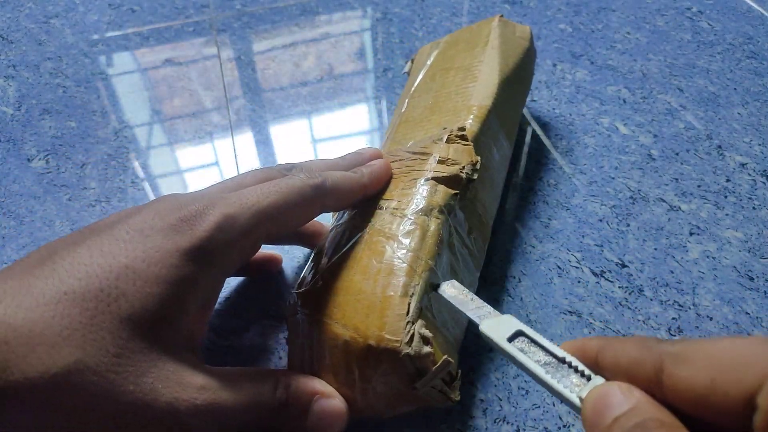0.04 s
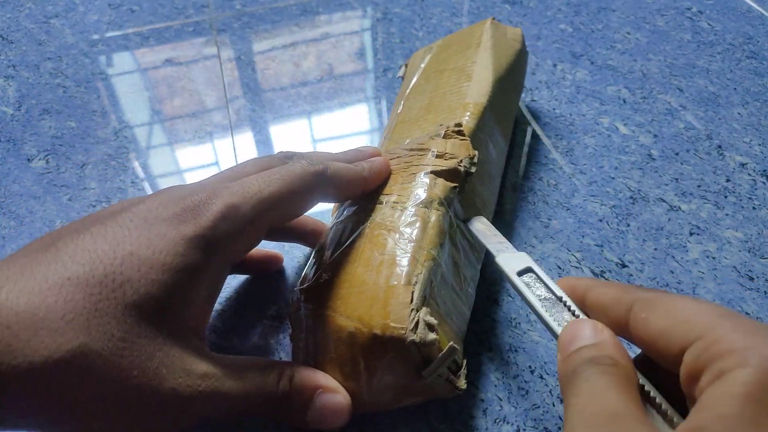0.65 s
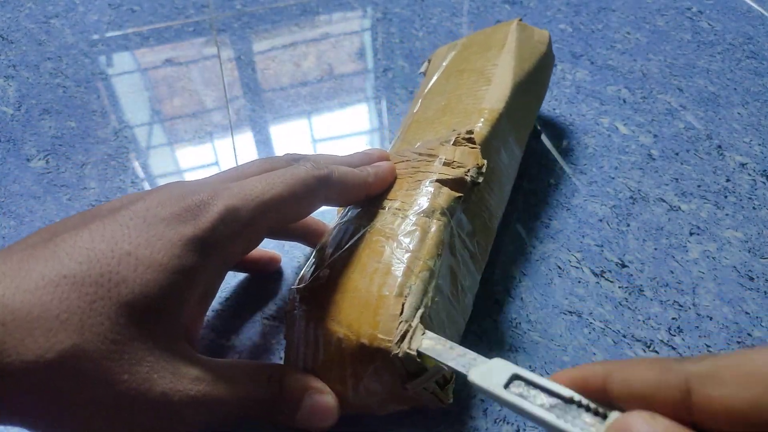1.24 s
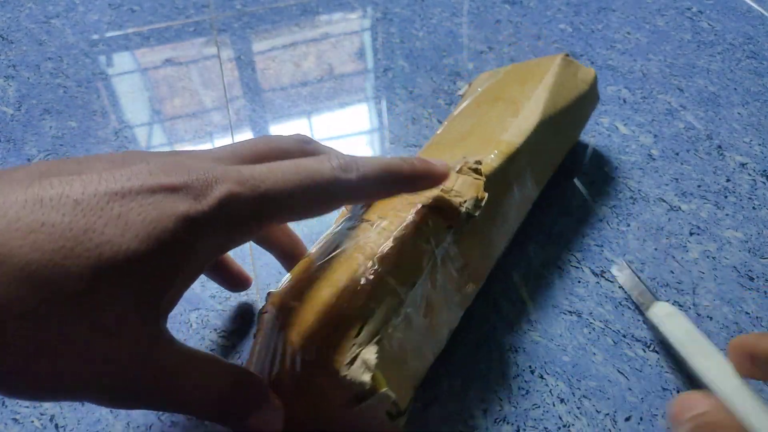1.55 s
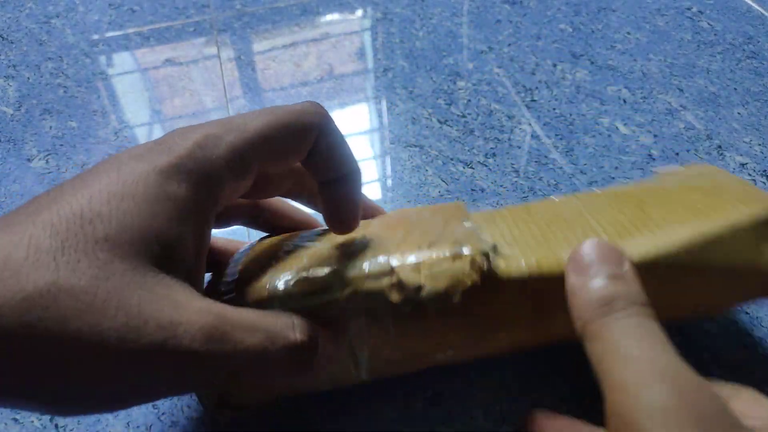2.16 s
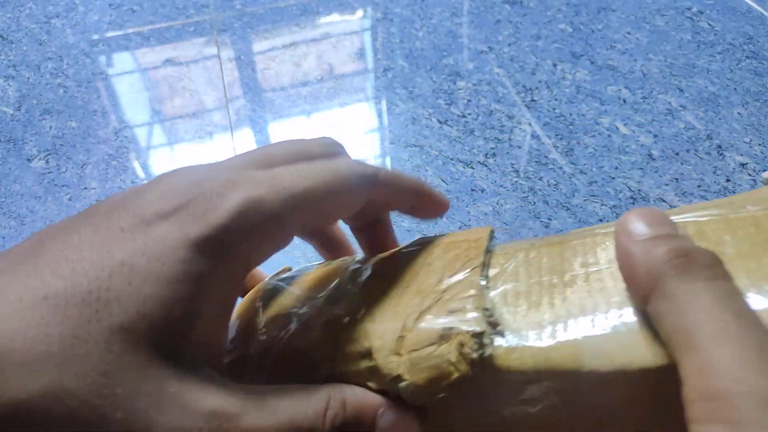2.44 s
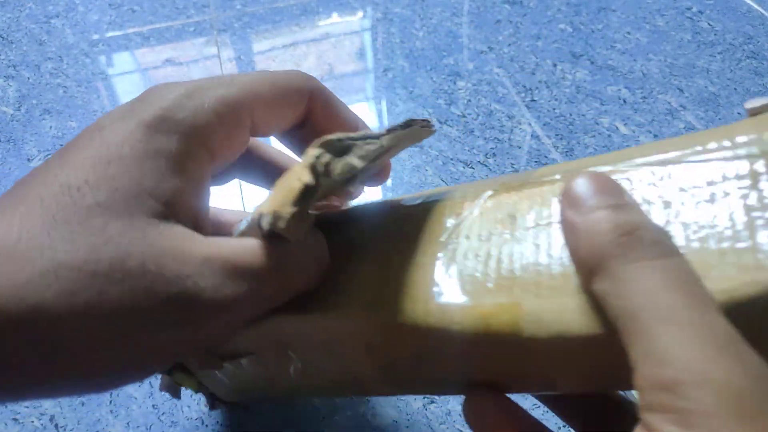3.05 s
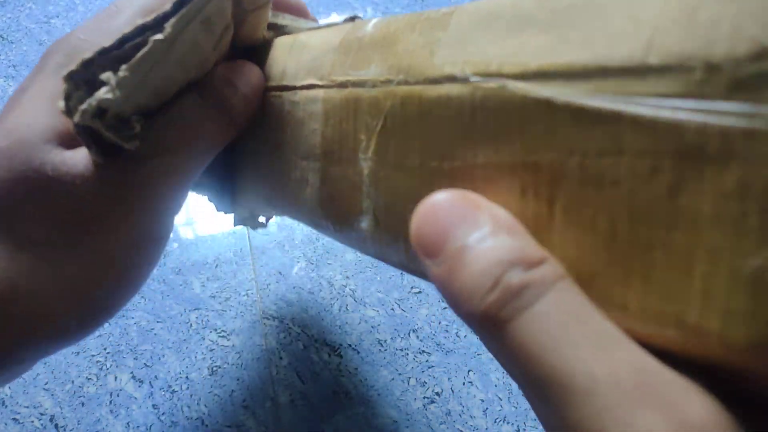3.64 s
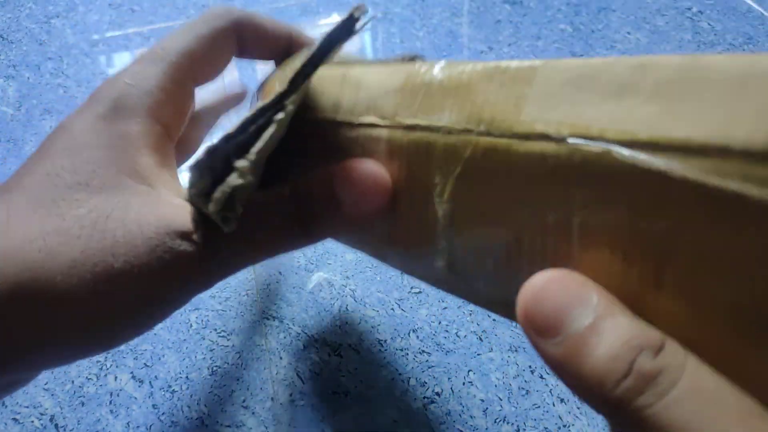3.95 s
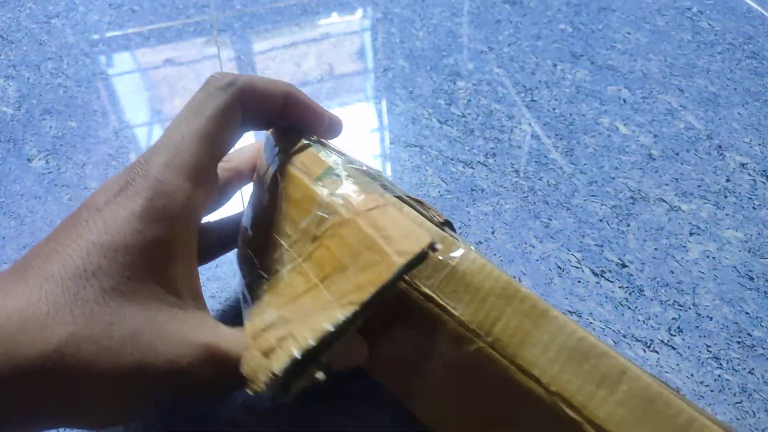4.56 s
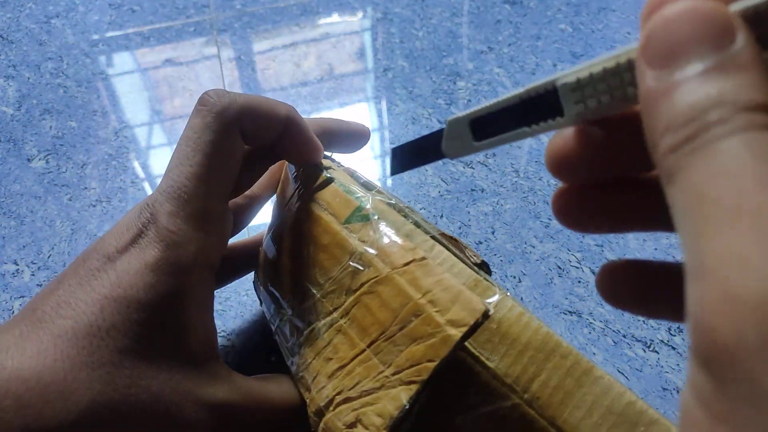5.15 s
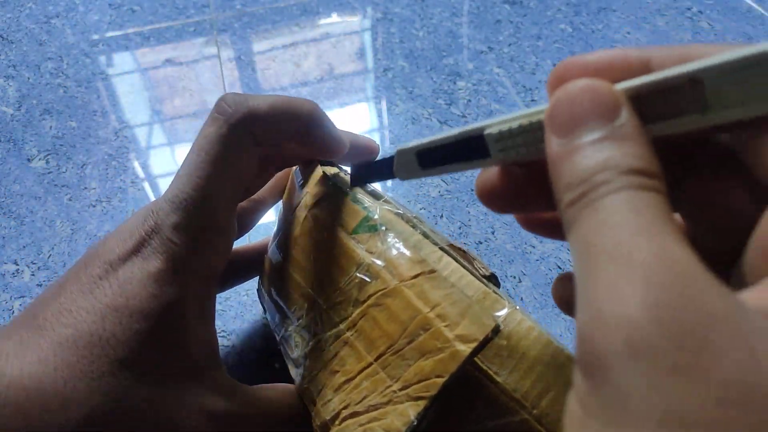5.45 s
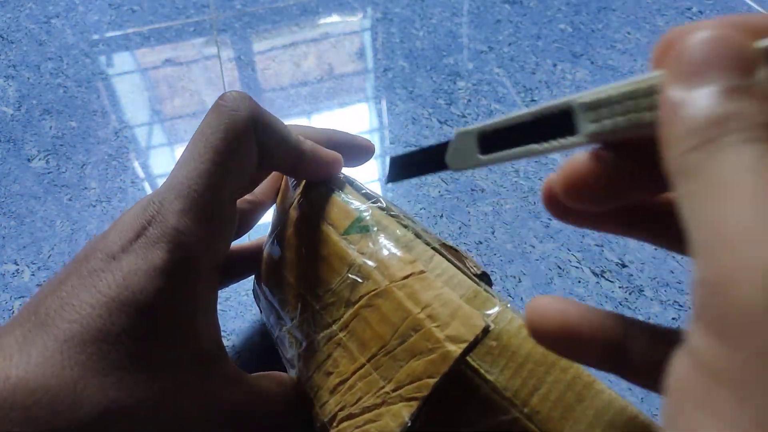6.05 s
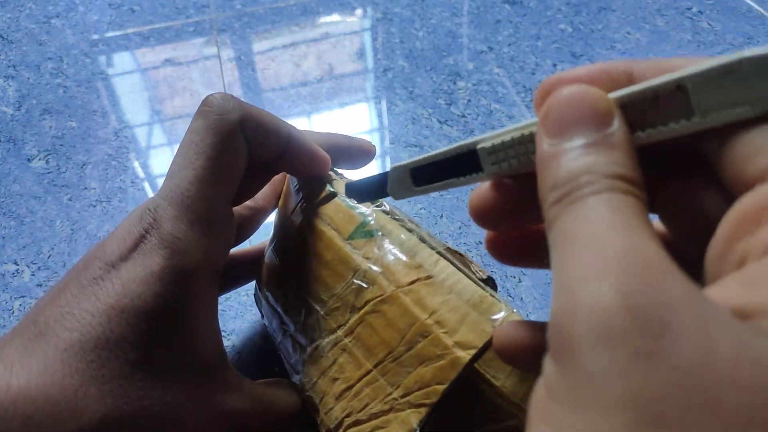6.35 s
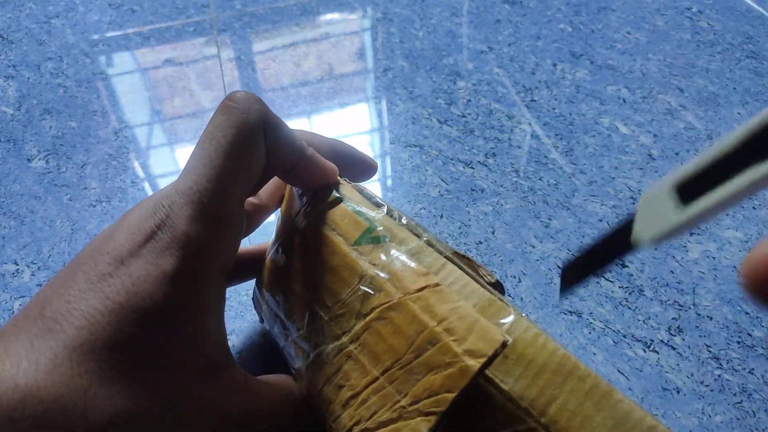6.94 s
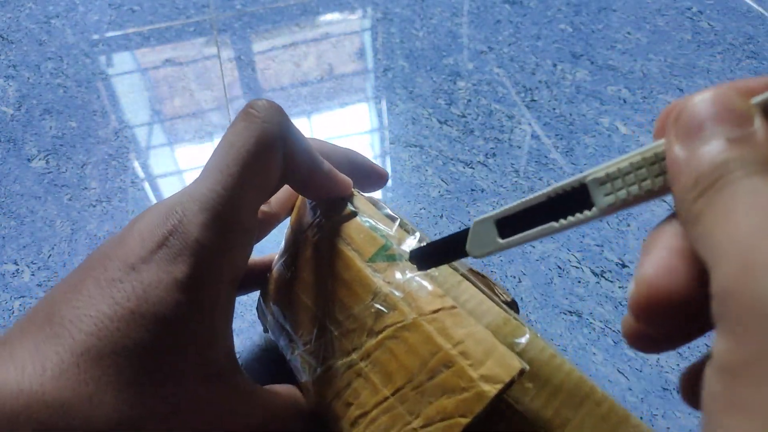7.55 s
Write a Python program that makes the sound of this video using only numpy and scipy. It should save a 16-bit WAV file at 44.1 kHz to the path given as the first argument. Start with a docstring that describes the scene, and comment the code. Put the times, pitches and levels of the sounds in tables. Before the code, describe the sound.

Small sharp cracks and faint rubbing as a knife cuts packing tape on a cardboard box in an echoing room.

```python
"""Short, sharp snaps and soft scraping: a snap-off knife picks at the tape on a cardboard parcel.
Each tear cracks the tight tape and shakes the card and the hollow box under it. The knife is laid
on the stone floor with a clatter, hands turn the parcel, and cutting resumes, ending in a squeak.
The hard-walled room echoes; behind it all are a soft room noise, a hum and a far engine's low drone."""
import sys
import numpy as np
from scipy import signal
from scipy.fft import rfft, irfft
from scipy.io import wavfile
from scipy.ndimage import uniform_filter1d

SR = 44100
rng = np.random.default_rng(int(sys.argv[2]) if len(sys.argv) > 2 else 0)


def master(y):
    """Save y as 16-bit WAV."""
    cut = np.clip(np.atleast_2d(y).T, -1, 1)
    pcm = np.round(cut * 32767)  # scale
    wavfile.write(sys.argv[1], SR, pcm.astype(np.int16))


N = 343980
TIME = np.arange(N) / SR   # clock for the whole scene [s]
HIT = np.arange(SR // 4) / SR   # clock for one short sound [s]
SMALL_SNAP_S = 0.0033   # length of one catch or crinkle


def from_db(db):
    """Turn decibels into a number to multiply by."""
    return 10 ** (np.asarray(db) / 20)


def rms_one(x):
    """Scale a sound to an average power of one."""
    return x / np.sqrt(np.mean(x ** 2) + 1e-20)


def peak_one(x):
    """Scale a sound so that its loudest two milliseconds have a power of one."""
    return x / np.sqrt(uniform_filter1d(x ** 2, size=88).max() + 1e-20)


def in_time(rows):
    """Join timed points with straight lines, giving one curve for each column after the time."""
    times, *columns = np.transpose(rows)
    return [np.interp(TIME, times, column) for column in columns]


def at_hz(points, hz):
    """Read a value between frequency points, with octaves evenly spaced."""
    frequencies, values = np.transpose(points)
    return np.interp(np.log(np.maximum(hz, 1)), np.log(frequencies), values)


def coloured(x, spectrum):
    """Shape a sound's bass and treble, then scale it to a power of one."""
    gains = from_db(at_hz(spectrum, np.fft.rfftfreq(N, 1 / SR)))
    return rms_one(irfft(rfft(x) * gains, N))


def drift(rate):
    """Wander around zero, gliding to a new random value `rate` times a second."""
    targets = rng.standard_normal(4000)
    return np.interp(TIME * rate, np.arange(len(targets)), targets)


def resonate(x, hz, width):
    """A resonance: keep the sound near one pitch. The narrower it is, the longer it rings."""
    r = np.exp(-np.pi * width / SR)
    feedback = [1, -2 * r * np.cos(2 * np.pi * hz / SR), r * r]
    return signal.lfilter(np.array([1, 0, -1]) * (1 - r * r) / 2, feedback, x + 1e-18)


def ring(hz, ring_s):
    """A struck tone that fades by 60 dB in its ring time."""
    return np.sin(2 * np.pi * hz * HIT) * from_db(-60 * HIT / ring_s)


def add(track, s, sound):
    """Mix a sound into a track, starting at second `s`."""
    i = max(round(s * SR), 0)
    track[i:i + len(sound)] += sound[:N - i]


def burst(length, per_s):
    """One click, then a few milliseconds of random follow-up clicks."""
    clicks = rng.standard_normal(len(HIT)) * (rng.random(len(HIT)) < per_s / SR)
    clicks[0] = 1
    return clicks * np.exp(-np.minimum(HIT / max(length, 5e-4), 6) ** 3)


def pulsing(curve, overtones, jitter, waver_db, rate):
    """The tone of a repeating slip or engine firing, a little unsteady in pitch and strength."""
    hz, level_db = in_time(curve)
    phase = 2 * np.pi * np.cumsum(hz * (1 + jitter * drift(rate))) / SR
    tone = sum(from_db(db + waver_db * drift(rate)) * np.sin(round(k) * phase) for k, db in overtones)
    return from_db(level_db) * rms_one(tone) * (TIME >= curve[0][0])


def room_noise():
    """Noise from outside fills the room and builds up at its low resonances."""
    # tone of the noise: (frequency [Hz], relative level [dB])
    air_colour = [(25, -21.5), (40, -4), (80, -22.5), (101, -26), (170, -3), (240, -3), (340, -3.5),
                  (460, -9.5), (850, -8), (1200, -11.5), (1900, -15), (3000, -19.5), (5000, -21.5),
                  (7500, -32.5)]
    # the room's resonances: (pitch [Hz], width [Hz], level [dB])
    resonances = [(73.7, 9.8, -79), (132, 5.9, -76), (164.5, 6.9, -76), (211.3, 16, -67.5)]
    air = from_db(-60.5) * coloured(rng.standard_normal(N), air_colour)
    return air + sum(from_db(db) * rms_one(resonate(rng.standard_normal(N), hz, width))
                     for hz, width, db in resonances)


def building_hum(hz):
    """One low tone in the building wavers in strength and pitch."""
    # the hum's rise and fall: (time [s], level [dB])
    levels = [(0, -71), (.6, -71.5), (.9, -92), (2.5, -86), (3.1, -75.5), (5.7, -78), (6.6, -64.5),
              (7, -74.5), (7.8, -69)]
    gain = from_db(in_time(levels)[0] + 4.2 * drift(9.9))
    return gain * rms_one(np.sin(2 * np.pi * hz * TIME + 1.3 * drift(4.9)))


def far_engine():
    """An engine fires so quickly that its beats merge into a drone."""
    # how the engine runs: (time [s], firing rate [Hz], level [dB])
    running = [(0, 47, -76), (.6, 50, -76), (1.2, 55, -86), (2, 45, -75), (3.5, 44, -79), (4.6, 44, -72),
               (5.5, 44, -69), (6, 42, -64.5), (7.0, 42, -65), (7.3, 42.5, -59), (7.8, 43, -57)]
    # tones in the drone: (multiple of the firing rate, relative level [dB])
    overtones = [(1, -3.5), (2, -17.5), (3, -18), (4, -15), (5, -16.5)]
    return pulsing(running, overtones, jitter=0.0355, waver_db=1.5, rate=14)


def room_echoes(x, first_echo_s):
    """Hard walls keep sound bouncing: each frequency band stores energy and lets it fade as noise."""
    # borders between the bands: (frequency [Hz])
    edges = [150, 400, 750, 1150, 1600, 2200, 3000, 3900, 4700, 5500, 6100, 6800, 8600]
    # how long echoes last: (frequency [Hz], time to fade by 60 dB [s])
    fade_times = [(300, 0.26), (1200, .36), (3000, 0.37), (6000, .42), (8000, 0.38)]
    # how strong they are: (frequency [Hz], level relative to the sound fed in [dB])
    levels = [(300, -14), (1000, -8.5), (2800, -12.5), (4500, -10), (6000, -6), (8000, -9)]
    out, lag = np.zeros(N), round(first_echo_s * SR)
    for low, high in zip(edges, edges[1:]):
        hz = np.sqrt(low * high)
        band = signal.butter(3, [low, high], "band", fs=SR, output="sos")
        keep = from_db(-60 / (at_hz(fade_times, hz) * SR)) ** 2   # share of energy left after a sample
        stored = signal.lfilter([1 - keep], [1, -keep], signal.sosfilt(band, x + 1e-12) ** 2)
        noise = rms_one(signal.sosfilt(band, rng.standard_normal(N)))
        out[lag:] += from_db(at_hz(levels, hz)) * (np.sqrt(stored) * noise)[:N - lag]
    return out


def sliding_gain(grip_db=-70, rise_share=0.18, fall_share=0.43):
    """Each stroke swells, holds and lets go, over the faint rub of hands holding the parcel."""
    # strokes of hand or blade along the tape: (start [s], length [s], level [dB])
    strokes = [(0.01, 0.3, -65.5), (0.989, 0.17, -59), (1.15, 0.18, -61), (1.862, 0.15, -66.5),
               (2.209, .012, -51.5), (2.408, 0.1, -59.5), (3.02, 0.067, -58), (3.137, 0.21, -63.5),
               (3.452, 0.31, -65), (3.805, 0.37, -65), (4.269, 0.089, -65.5), (4.574, 0.11, -64.5),
               (5.066, .027, -52), (5.736, 0.12, -58), (5.997, 0.84, -68), (6.628, .07, -56),
               (6.757, 0.065, -61.5), (6.9, 0.73, -72), (7.388, 0.46, -62.5)]
    power = from_db(grip_db) ** 2
    for start, length, db in strokes:
        rise = np.clip(.5 + (TIME - start) / (rise_share * length), 0, 1)
        fall = np.clip(.5 + (start + length - TIME) / (fall_share * length), 0, 1)
        power = power + (from_db(db) * rise * fall) ** 2
    return np.sqrt(power)


def rubbing(grains_per_s, size_db, clump_db, hiss_gain):
    """Sliding over the tape makes clumps of tiny clicks on top of a fine friction hiss."""
    # tone of the rubbing: (frequency [Hz], relative level [dB])
    colour = [(500, -11), (950, 2.5), (1500, -3.5), (2600, -1), (4000, -4), (6000, 0.5), (7500, -3.5),
              (9000, -5.5)]
    caught = rng.random(N) < grains_per_s * from_db(clump_db * drift(70)) / SR
    grains = caught * rng.choice([-1, 1], N) * from_db(size_db * np.minimum(rng.exponential(1, N), 4))
    hiss = hiss_gain * rng.standard_normal(N)
    return sliding_gain() * coloured(rms_one(grains) + hiss, colour)


def finger_drags(slips_per_s):
    """Skin sticks and slips on the card, stirring one broad resonance of the box wall."""
    # fingertips on bare card: (middle [s], level [dB], half length [s])
    drags = [(3.17, -64, 0.013), (3.505, -68, 0.013), (3.92, -63.5, 0.011), (4.283, -65, .025)]
    slips = rng.standard_normal(N) * (rng.random(N) < slips_per_s / SR)
    pressure = sum(from_db(db) * np.exp(-np.minimum(((TIME - s) / half) ** 2, 20))
                   for s, db, half in drags)
    return pressure * rms_one(resonate(slips, hz=2570, width=520))


def box_bumps():
    """A pressed wall of the box gives one quickly fading pop."""
    # fingers and blade denting the box: (time [s], peak level [dB], pitch [Hz], ring time [s])
    bumps = [(3.0618, -44, 292, .018), (3.617, -41, 2580, 0.0069), (4.382, -51, 334, 0.011),
             (7.705, -36, 1200, .014)]
    out = np.zeros(N)
    for s, db, hz, ring_s in bumps:
        bass_cut = signal.butter(2, hz / 2, "high", fs=SR, output="sos")
        pop = signal.sosfilt(bass_cut, ring(hz, ring_s))
        soft_start = 1 - np.exp(-HIT * hz)
        add(out, s, from_db(db) * peak_one(pop * soft_start))
    return out


def blade_squeak():
    """The blade slips along the tape hundreds of times a second, making a rough tone."""
    # course of the squeak: (time [s], pitch [Hz], level [dB])
    course = [(7.70, 450, -88), (7.725, 452, -67), (7.765, 440, -51.5), (7.8, 450, -52)]
    # tones in the squeak: (multiple of the pitch, relative level [dB])
    overtones = [(2, -5), (3, -14), (4, -15), (5, -13), (6, -18)]
    return pulsing(course, overtones, jitter=0.02, waver_db=4, rate=350)


def knife_clatter(level_db, spread_db):
    """Each knock rattles the loose blade in its guide; a glancing one rings mostly the high tones."""
    # tones of the blade and its steel guide: (pitch [Hz], relative level [dB], ring time [s])
    steel_tones = [(2620, -18.5, 0.009), (3520, -11, 0.006), (4040, -10, 0.0065), (4620, -9, 0.013),
                   (5170, -9.5, 0.011), (5763, -5.5, 0.032), (6250, -6.5, 0.023), (6400, -7, 0.0085),
                   (6860, -8.5, 0.0072), (7330, -5.5, 0.017), (8300, -3, 0.0033)]
    # knocks on the floor: (time [s], relative peak [dB], rattle length [s], brightness [dB per octave])
    knocks = [(1.5797, -35, 0.0058, 2), (1.6127, -48, .0032, -8), (1.628, -29, 0.0046, -5),
              (1.6328, -27, 0.0058, 0), (1.68, -49, .005, 1), (1.732, -29, 0.0034, 5.5),
              (2.166, -48, .0027, 4), (2.2226, -31, 0.0056, 3.5), (2.301, -41, .0039, 2.5),
              (4.3332, -47, 0.002, 0), (4.362, -53.5, .002, -2)]
    out = np.zeros(N)
    rings = np.array([(-1) ** k * from_db(db) * ring(hz, ring_s)
                      for k, (hz, db, ring_s) in enumerate(steel_tones)])
    octaves = np.log2(np.array(steel_tones)[:, 0] / steel_tones[0][0])
    for s, db, length, brightness in knocks:
        gains = from_db(brightness * octaves + spread_db * rng.standard_normal(len(steel_tones)))
        rattle = signal.fftconvolve(burst(length, per_s=6000), gains @ rings)
        add(out, s, from_db(db + level_db) * peak_one(rattle))
    return out


def blade_catches(gap_s=.0172, jitter_s=.0016, spread_db=3):
    """List the snaps of a cutting blade, which sticks and breaks free at a nearly even pace."""
    # runs through the tape: (start [s], length [s], base level [dB], card movement [dB])
    cuts = [(0.2758, .062, -49, -6.5), (1.005, .03, -53, 1), (5.7775, .078, -48, -3.5),
            (6.774, .04, -56.5, -1)]
    rows = []
    for start, length, db, card_db in cuts:
        for s in np.arange(start, start + length, gap_s):
            late, harder = rng.standard_normal(2)
            rows.append((s + jitter_s * late, db + spread_db * harder, card_db, SMALL_SNAP_S))
    return rows


def tape_crinkles(per_s=12, tries=200, threshold_db=-64, over_stroke_db=6.5, spread_db=3, card_db=-4):
    """List the faint random snaps of pressed tape; they follow the stroke, and a still grip gives none."""
    stroke_db = 20 * np.log10(sliding_gain())
    moments = rng.integers(0, N, tries)
    chosen = rng.random(tries) < per_s * N / SR / tries
    sizes = rng.standard_normal(tries)
    return [(i / SR, stroke_db[i] + over_stroke_db + spread_db * size, card_db, SMALL_SNAP_S)
            for i, size in zip(moments[chosen], sizes[chosen]) if stroke_db[i] > threshold_db]


def tape_snaps(tape_db, flap_db, box_db, detune):
    """Each tear cracks the tight tape and shakes the card flap and the hollow box under it."""
    # single tears: (time [s], base level [dB], card movement [dB], length [s])
    tears = [(0.762, -40.5, -9, 0.0027), (0.9494, -52.5, -2.5, 0.0066), (1.047, -58, 11, .004),
             (1.0651, -49.5, 6, .0025), (1.07, -43.5, -13, 0.0033), (1.2324, -45, -7, 0.0027),
             (1.2545, -35.5, -10, 0.006), (1.2898, -47.5, -3.5, 0.0046), (1.322, -39.5, -9.5, 0.0049),
             (1.789, -45, -2.5, 0.0056), (2.4525, -46.5, -15, .0046), (2.4747, -42, -7, .002),
             (2.6687, -40, -7, 0.0041), (2.712, -49.5, -6, .002), (2.9602, -30.5, -13.5, 0.0022),
             (3.063, -48.5, 0.5, 0.005), (4.386, -61, 6, 0.0026), (4.644, -49.5, -24, .003),
             (4.831, -55.5, -17, 0.0038), (4.958, -58, -6, 0.0036), (5.632, -49, -23, .0033),
             (5.7432, -36, -10.5, 0.0031), (5.8708, -24.5, -2, 0.0041), (6.434, -53, -12, .004),
             (6.582, -46.5, -8.5, .005), (6.6185, -23.5, -4.5, 0.0026), (6.683, -43, -15, .003),
             (6.8719, -33.5, -4.5, 0.0066), (6.8769, -27.5, -3, 0.0043), (7.4516, -48, -1.5, .003),
             (7.464, -42.5, 5, 0.0047), (7.4687, -33.5, -9.5, 0.0024), (7.704, -36, -2.5, 0.0079)]
    # resonances of the tape, the flap and the box: (pitch [Hz], width [Hz], relative level [dB])
    tape = [(4530, 130, -5.5), (4940, 300, -8), (5820, 620, 1), (6970, 350, -6), (7370, 110, -3.5)]
    flap = [(1793, 140, -4), (2464, 170, -3), (3050, 420, -2), (3964, 570, 1.5)]
    box = [(345, 68, -11), (830, 180, 0), (1006, 190, 5.5), (1270, 310, -3.5)]
    box_follows = 1.31   # dB of hollow box tone for each dB of card movement
    bass_cut = signal.butter(2, 600, "high", fs=SR, output="sos")   # light card gives off little bass
    out = np.zeros(N)
    for s, db, card_db, length in tears + blade_catches() + tape_crinkles():
        tear = signal.sosfilt(bass_cut, burst(length, per_s=7700)[:SR // 16])
        tension = 1 + detune * rng.standard_normal()   # the grip shifts the pitch from snap to snap
        parts = (tape, tape_db), (flap, card_db + flap_db), (box, box_follows * card_db + box_db)
        for resonances, part_db in parts:
            body = sum((-1) ** k * from_db(tone_db) * rms_one(resonate(tear, hz * tension, width))
                       for k, (hz, width, tone_db) in enumerate(resonances))
            add(out, s, from_db(db + part_db) * peak_one(body))
    return out


def scene():
    """The parcel and the knife in the room, heard by one microphone."""
    background = room_noise() + building_hum(hz=72.8) + far_engine()
    knife = knife_clatter(level_db=1.94, spread_db=3.0)
    sliding = rubbing(grains_per_s=800, size_db=3.5, clump_db=6, hiss_gain=0.92)
    squeak = blade_squeak()
    parcel = box_bumps() + finger_drags(slips_per_s=2500)
    parcel += tape_snaps(tape_db=-2.5, flap_db=-1.13, box_db=-4.5, detune=0.015)
    # the knife lies farther off than the parcel, so more of its sound is echo
    echoes = room_echoes(parcel + from_db(2.5) * knife, first_echo_s=.002)
    mono = background + sliding + squeak + knife + parcel + echoes
    return np.array([mono, mono])


def record(dry):
    """The microphone's small opening resonates and lifts the treble; the very top is then cut steeply."""
    lifted = dry + from_db(-8.5) * resonate(dry, hz=6370, width=1500)
    cutoff_hz = 8720
    return signal.sosfilt(signal.cheby2(12, 54, cutoff_hz, fs=SR, output="sos"), lifted)


dry = scene()
out = record(dry)
master(out)
```